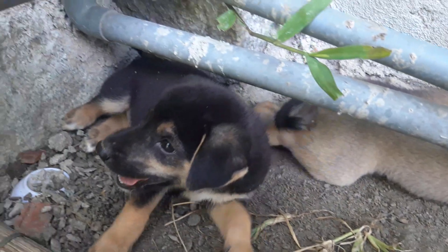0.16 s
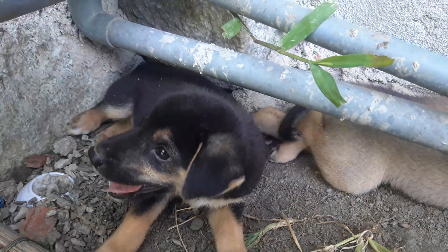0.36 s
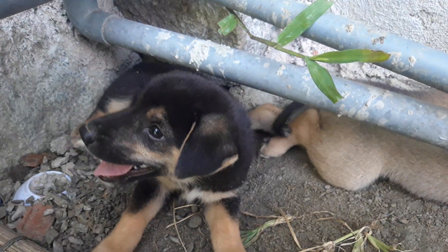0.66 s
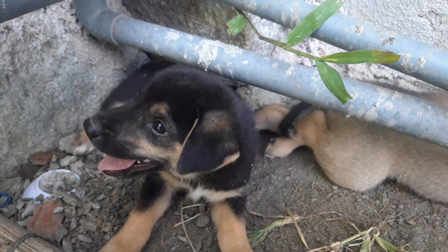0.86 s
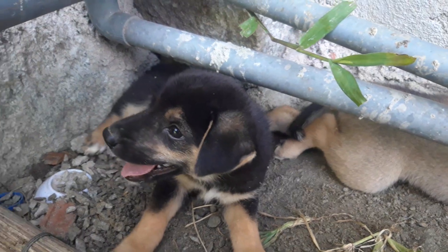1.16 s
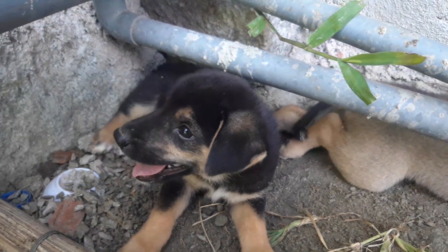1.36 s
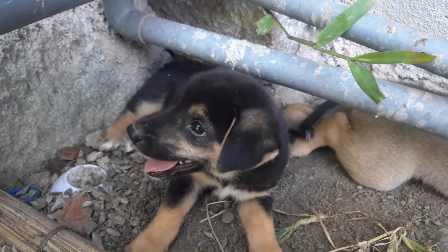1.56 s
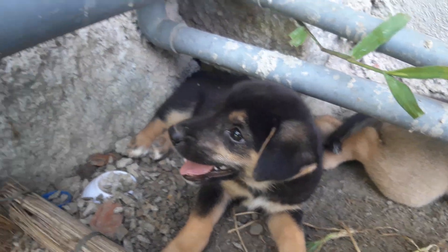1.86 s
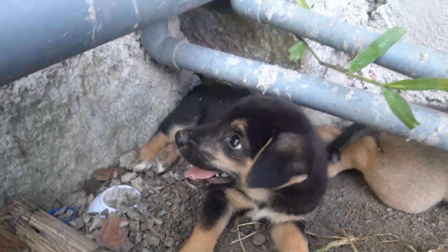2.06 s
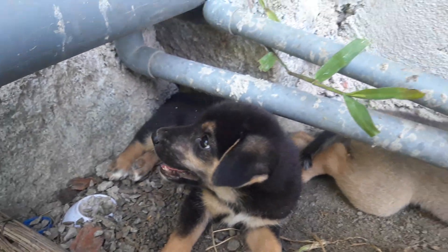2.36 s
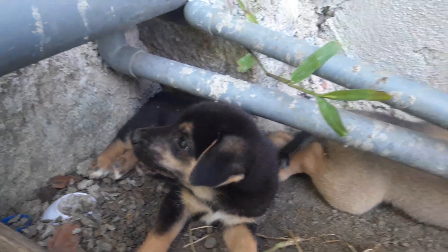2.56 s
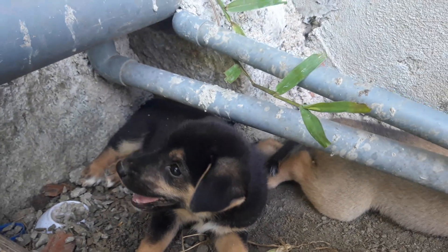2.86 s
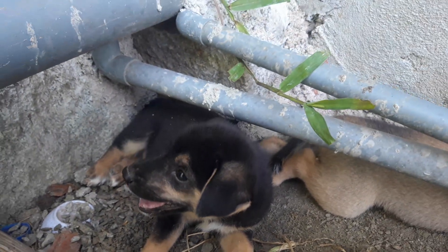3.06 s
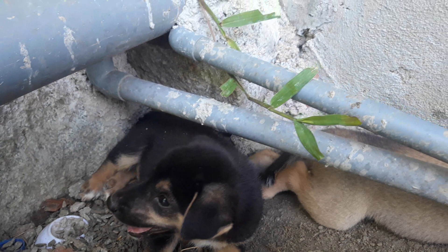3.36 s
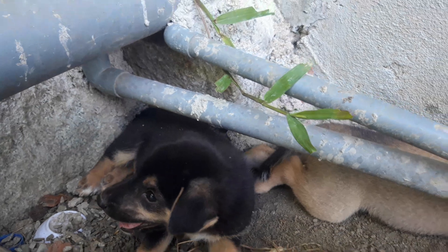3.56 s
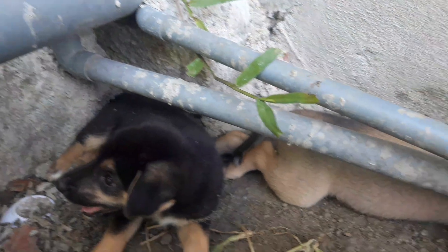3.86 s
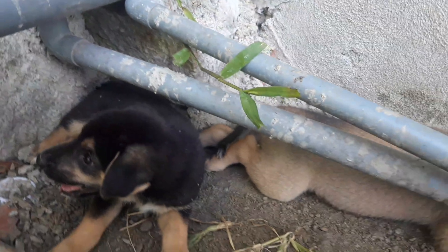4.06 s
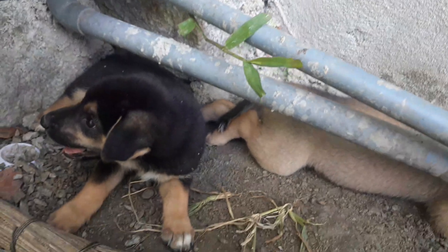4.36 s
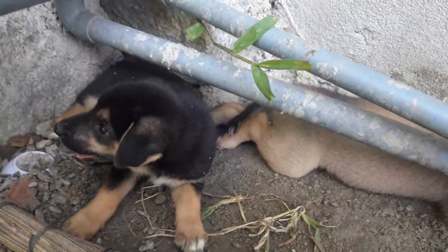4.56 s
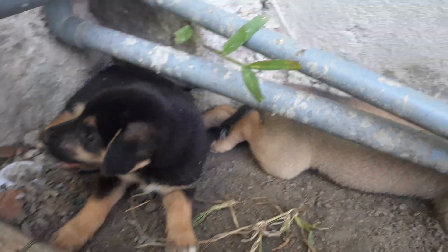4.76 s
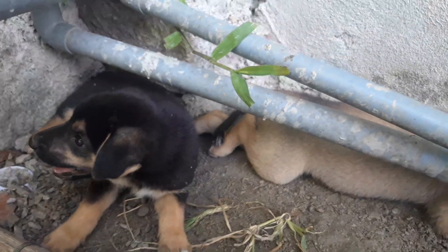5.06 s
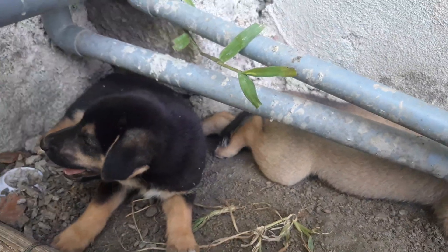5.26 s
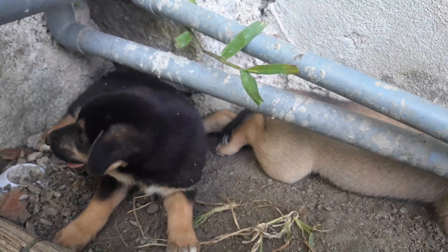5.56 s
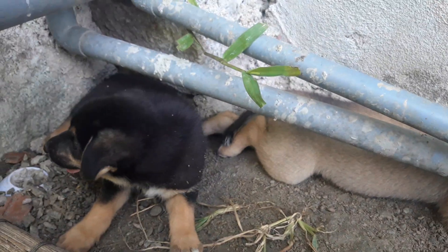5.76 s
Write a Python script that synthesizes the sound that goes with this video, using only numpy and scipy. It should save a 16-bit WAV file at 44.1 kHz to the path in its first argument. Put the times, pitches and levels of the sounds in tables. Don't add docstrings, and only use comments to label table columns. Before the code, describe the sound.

Close to the ground outdoors, a puppy pants in soft quick puffs and shifts on gravel and dry stalks, with bright snaps and crackles. Farther off, chicks give falling peeps, a small bird trills downward midway, and a hen clucks faintly. A cricket throbs early, distant traffic swells late, and cheeps gather near the end. Nearly mono, with light microphone hiss.

```python
import sys
import numpy as np
from scipy import signal
from scipy.fft import rfft, irfft, next_fast_len
from scipy.io import wavfile
from scipy.ndimage import uniform_filter1d

SR = 44100
rng = np.random.default_rng(int(sys.argv[2]) if len(sys.argv) > 2 else 0)


def rack_gain(trim_db):
    fader = np.asarray(trim_db, float)
    return 10 ** (fader / 20)


def store_wav(level_fs):
    pcm = np.round(np.clip(np.atleast_2d(level_fs), -1, 1) * 32767)
    wavfile.write(sys.argv[1], SR, pcm.T.astype(np.int16))


N = 261513
LEAD = SR // 5


def evened(x):
    return x / np.sqrt(np.mean(x ** 2) + 1e-20)


def read(points, hz):
    f, value = np.transpose(points)
    return np.interp(np.log(hz + 1), np.log(f + 1), value)


def curve(rows, column):
    return np.interp(np.arange(N) / SR, np.transpose(rows)[0], np.transpose(rows)[column])


def add(mix, s, sound):
    part = mix[LEAD + round(s * SR):][:len(sound)]
    part += sound[:len(part)]


def coloured(x, points):
    size = next_fast_len(len(x))
    gain = rack_gain(read(points, np.fft.rfftfreq(size, 1 / SR)))
    return irfft(rfft(x, size) * gain, size)[:len(x)]


def resonate(x, hz, width):
    b, a = signal.iirpeak(min(hz, .45 * SR), hz / width, SR)
    once = signal.lfilter(b, a, x)
    return signal.lfilter(b, a, once)


def swells(rows, column, rise):
    t, power = np.arange(N) / SR, 1e-10
    for row in rows:
        late = (t - row[0]) / row[1]
        bell = np.exp(-np.where(late < 0, late / rise, late) ** 2)
        power = power + rack_gain(row[column]) ** 2 * bell
    return np.sqrt(power)


TURNS_PER_S = 9


def echoes(x, t60, first_s):
    out, turn = 0, 2 * np.pi * TURNS_PER_S * np.arange(len(x)) / SR
    for share in (np.cos(turn), np.sin(turn)):
        at = np.arange(round(first_s * SR), SR // 2, 20)
        at = at + rng.integers(0, 20, len(at))
        taps = np.zeros(SR // 2 + 20)
        taps[at] = rng.choice([-1., 1.], len(at)) * rack_gain(-60 * at / SR / t60)
        taps = taps / np.linalg.norm(taps)
        out = out + share * signal.fftconvolve(x, taps)[:len(x)]
    return out


def notes(rows, held, fall=1, sag_per_s=0):
    return [(s, held * size, (1 - held) * size, hz, hz * fall * np.exp(-sag_per_s * size), db)
            for s, size, hz, db in rows]


def whistles(rows, bend, held_db, end_db, overtones_db, flutter, lands=False):
    out = np.zeros(LEAD + N)
    for s, held, falling, top_hz, low_hz, db in rows:
        t = np.arange(0, held + falling, 1 / SR)
        slide = np.clip((t - held) / falling, 0, 1) ** bend
        if lands:
            slide = np.sin(np.pi / 2 * slide) ** 2
        wobble = uniform_filter1d(rng.standard_normal(8000), size=60)
        wobble = evened(uniform_filter1d(wobble, size=60))[:len(t)]
        pitch_hz = top_hz * (low_hz / top_hz) ** slide * (1 + flutter * wobble)
        turns = np.cumsum(pitch_hz) / SR
        tone = sum(rack_gain(overtone_db) * np.sin(2 * np.pi * k * turns)
                   for k, overtone_db in enumerate([0, *overtones_db], 1))
        effort = [held_db - 3, held_db, 0, end_db]
        effort_db = db + np.interp(t, [0, held, held + .5 * falling, t[-1]], effort)
        add(out, s, np.sqrt(2) * rack_gain(effort_db) * tone * signal.windows.tukey(len(t), .3))
    return out


# f/Hz, level/dB per Hz
HISS = [(210, -31), (350, -17), (386, -13), (596, -7.5), (1420, -14.5), (2060, -14.5), (3090, -2.5),
        (5170, 2), (6370, -6), (8250, 4), (10300, -14), (11800, -7.5), (14500, -13.5), (15700, -25),
        (16500, -38)]
HISS_DB = -59


def hiss():
    frames, hz = N // 256 + 5, np.fft.rfftfreq(1024, 1 / SR)
    a, b, patches = rng.standard_normal((frames, 513, 3)).T
    patches = uniform_filter1d(patches, size=12, axis=0)
    patches = evened(uniform_filter1d(patches, size=12, axis=1))
    z = (a + 1j * b) * rack_gain(read(HISS, hz)[:, None] + 1.9 * patches)
    return rack_gain(HISS_DB) * evened(signal.istft(z, nperseg=1024, noverlap=768)[1][:N])


# f/Hz, level/dB per Hz
RUMBLE = [(12, -52), (20, -23), (40, -11), (65, 3.5), (163, 0), (180, -6), (195, -32), (220, -12.5),
          (290, -63), (480, -120)]
# f/Hz, level/dB per Hz
BOOM = [(41, -42), (70, -23), (113, 0.5), (129, 2), (163, -7), (199, -25), (220, -15), (290, -41),
        (480, -120)]
# f/Hz, level/dB per Hz
DRONE = [(110, -73), (190, -2.5), (205, -5), (270, -1), (318, -0.5), (360, -6), (414, -9), (520, -12),
         (680, -56), (1140, -120)]
# peak t/s, fading t/s, boom level/dB, drone level/dB
PASSES = [
    (.1, 0.41, -65, -82),
    (1.45, 0.19, -63.5, -79),
    (1.68, 0.067, -58.5, -88),
    (1.92, 0.25, -62.5, -79),
    (4.45, 0.24, -65.5, -75.5),
    (4.78, 0.12, -52, -65.5),
    (5.05, 0.26, -52, -65.5),
    (5.32, 0.073, -52.5, -83),
    (5.5, 0.15, -59, -78),
    (5.7, 0.18, -57, -75),
]
RUMBLE_DB, DRONE_FLOOR_DB = -66.5, -83.5
PASS_RISE = 0.64


def traffic():
    rumble, boom, drone = (evened(coloured(rng.standard_normal(N), c)) for c in (RUMBLE, BOOM, DRONE))
    engine_note = evened(resonate(rng.standard_normal(N), 313.2, 15.7))
    drone = drone + rack_gain(-4.0) * engine_note
    boom_gain = swells(PASSES, column=2, rise=PASS_RISE)
    drone_gain = np.hypot(rack_gain(DRONE_FLOOR_DB), swells(PASSES, column=3, rise=PASS_RISE))
    return rack_gain(RUMBLE_DB) * rumble + boom_gain * boom + drone_gain * drone


# t/s, throbs per s, level/dB
CRICKET = [
    (0, 11, -73),
    (.7, 10, -70),
    (1.0, 10, -66.5),
    (1.6, 7.9, -67),
    (2.2, 8.5, -68.5),
    (2.8, 6.1, -76),
    (3.0, 10.3, -109),
    (5.93, 6.9, -67.5),
]


def cricket():
    throb = .5 + .5 * np.cos(2 * np.pi * (np.cumsum(curve(CRICKET, 1)) / SR + 0.67))
    wing = evened(resonate(rng.standard_normal(N), 9240, 1100))
    return rack_gain(curve(CRICKET, 2) + 1.5) * (0.62 + throb ** 0.5) * wing


# peak t/s, fading t/s, fine grit level/dB, coarse scrape level/dB
SHIFTS = [(0, 0.12, -57.5, -64.5), (.3, 0.15, -60.5, -67), (.62, 0.19, -59.5, -71.5),
          (1.63, 0.11, -56.5, -66.5), (1.8, 0.15, -56.5, -67), (2.2, 0.43, -68.5, -92),
          (2.92, 0.077, -65, -74), (3.85, 0.69, -63, -71), (4.02, 0.1, -58, -62), (4.13, 0.046, -68, -61.5),
          (4.23, 0.25, -61.5, -77), (4.65, 0.21, -64.5, -76), (5.5, 0.38, -69.5, -76.5)]
SHIFT_RISE = 0.44


def grit(per_s, spread_db, colour, column):
    size_db = spread_db * np.minimum(rng.exponential(1, N), 2.6)
    grains = rng.standard_normal(N) * rack_gain(size_db)
    grains = evened(grains * (rng.random(N) < per_s / SR))
    keep = np.exp(-1 / (0.0021 * SR))
    scatter = np.sqrt(signal.lfilter([1 - keep], [1, -keep], grains ** 2)) * rng.standard_normal(N)
    return swells(SHIFTS, column, SHIFT_RISE) * evened(coloured(grains + rack_gain(7.0) * scatter, colour))


# f/Hz, level/dB per Hz
RUSTLE_COLOUR = [(530, -29), (900, -21.5), (991, -54), (1250, -32), (2020, -12.5), (3340, -0.5), (4310, -3),
                 (5410, 0), (6410, -8), (7680, -2), (8760, -6), (10400, -21.5), (11700, -9), (15100, -20.5),
                 (16000, -10)]
# f/Hz, level/dB per Hz
SCRAPE_COLOUR = [(500, -45), (800, -12), (1000, -5), (1500, -9), (2100, -5), (2600, 0), (3600, -3),
                 (6000, -20), (9000, -60)]


def rustle():
    fine = grit(2700, 4.1, RUSTLE_COLOUR, column=2)
    scrape = grit(1200, 0.75, SCRAPE_COLOUR, column=3)
    return rack_gain(7.5) * fine + rack_gain(3.0) * scrape


# peak t/s, fading t/s, level/dB
CRUSHES = [(1.59, .028, -53), (1.62, .04, -50), (1.66, .04, -52), (1.72, 0.036, -52), (1.79, .04, -51),
           (1.83, 0.045, -49), (1.9, .05, -54), (.65, 0.033, -59), (2.31, .03, -60), (2.49, .04, -63),
           (4.13, .05, -62), (4.38, 0.055, -58), (4.69, .04, -64)]
# f/Hz, width/Hz, level/dB
CRACKLE_RINGS = [
    (3660, 1300, -9),
    (5400, 710, 0.5),
    (7930, 1600, -1),
    (12300, 2500, -9),
    (14800, 2000, -10),
]


def crush():
    size_db = 4 * np.minimum(rng.exponential(1, N), 2.4)
    breaks = rng.standard_normal(N) * rack_gain(size_db) * (rng.random(N) < 3500 / SR)
    rings = sum(rack_gain(db) * evened(resonate(breaks, hz, width)) for hz, width, db in CRACKLE_RINGS)
    return swells(CRUSHES, column=2, rise=.4) * evened(rings)


# t/s, peak level/dB, ring f/Hz, treble over ring/dB
STALKS = [(0.1303, -25.5, 4000, 0), (0.2345, -29, 4000, -3), (0.271, -42, 5530, 0),
          (0.6386, -27.5, 6160, 1), (1.248, -33.5, 4740, 0), (1.5858, -25.5, 3800, 15),
          (1.6158, -27, 5280, 5), (1.6509, -26, 5760, 4), (1.7127, -19.5, 5500, 3), (1.716, -26, 5400, 16),
          (1.723, -21, 5600, 0.5), (1.7374, -17, 5500, 4), (1.778, -20, 4450, 9), (1.8085, -22.5, 5600, 2),
          (1.8597, -25.5, 5400, 0), (1.894, -24.5, 5700, 0), (1.952, -33, 3630, 11),
          (2.028, -26.5, 4300, -6), (2.2553, -33.5, 3250, 20), (2.311, -26, 5400, 3),
          (2.4703, -49, 3050, 12), (2.502, -34.5, 5050, -11), (4.044, -45, 5270, 5),
          (4.0685, -36, 3200, -4), (4.168, -37, 5130, 13.5), (4.2043, -43, 5150, 6), (4.221, -47, 5500, 8),
          (4.276, -42, 6840, 0), (2.4939, -42, 5000, 12), (2.5478, -45, 5040, 10), (3.744, -52, 6800, -5),
          (3.908, -40, 6000, 3), (3.997, -45, 6500, -3), (4.6697, -31.5, 3080, 0),
          (4.7002, -30, 4370, -2.5), (4.914, -36.5, 3800, 0)]
# t/s, peak level/dB, ring f/Hz
GRIT = [(0.1162, -30, 4800), (0.26, -40, 4300), (.559, -41, 3900), (.564, -37, 3600), (.568, -37, 3900),
        (0.56, -40, 7800), (0.672, -39, 6500), (.173, -37, 5100), (0.4, -32, 4800), (.393, -33, 4100),
        (0.573, -36, 4300), (0.661, -38, 6100), (1.2397, -32, 4800), (1.3, -38, 4700), (1.8, -34, 5540),
        (1.674, -33, 5800), (1.692, -36, 5500), (1.6095, -33, 5300), (1.5, -29, 5600), (1.844, -31, 5600),
        (1.755, -33, 4100), (1.9386, -31, 4000), (2.0877, -41, 5230), (2.1132, -32, 5100),
        (2.2152, -35.5, 5700), (2.315, -24.5, 5670), (3.5192, -26.5, 4660), (3.543, -46, 5000),
        (3.9517, -35, 4900), (4.1089, -26.5, 5000), (4.1353, -28, 6500), (4.6, -39, 4500),
        (4.083, -38, 4500), (4.398, -34.5, 6300), (4.429, -39, 4000), (4.448, -40.5, 4200),
        (4.274, -31, 4640), (4.348, -31.5, 4240), (4.3538, -30.5, 5400), (4.3856, -32.5, 4930),
        (4.4026, -32, 4060), (4.798, -39, 4660), (2.528, -42, 3800), (5.2864, -44, 4500),
        (2.3816, -39, 5700), (2.16, -38, 4800), (3.678, -45, 5500), (3.79, -42, 5000), (5.689, -42, 6500),
        (5.709, -38, 3200), (4.4, -44, 3000), (2.86, -43, 3200), (3.2, -44, 5000)]
# t/s, peak level/dB, ring f/Hz
KNOCKS = [(0.1157, -32, 2460), (0.1226, -33, 2300), (0.168, -47, 2550), (0.5605, -45, 2300),
          (0.566, -45, 2300), (0.5715, -39, 2250), (0.5767, -49, 2440), (.584, -48, 2300), (.59, -51, 2500),
          (1.777, -53, 2630), (1.777, -28, 2200), (4.0442, -35, 1750), (4.04, -41, 3000), (4.05, -47, 1100),
          (4.068, -38, 2600), (4.1083, -39, 1770), (4.4124, -43, 2680), (5.368, -36.5, 2400)]
GRIT_TREBLE_DB, TOP_UNDER_TREBLE_DB = -15, -6


def snaps():
    out, t = np.zeros(LEAD + N), np.arange(0, .012, 1 / SR)
    for s, peak_db, hz, treble_db in STALKS + [(*row, GRIT_TREBLE_DB) for row in GRIT]:
        splinter = rng.standard_normal(len(t)) * np.exp(-t / .0018) + 2 * (t == 0)
        bands = [(0, hz, .4 * hz), (treble_db, 8200, 1900), (treble_db + TOP_UNDER_TREBLE_DB, 12800, 5000)]
        crack = sum(rack_gain(db) * evened(resonate(splinter, f, width)) for db, f, width in bands)
        add(out, s, rack_gain(peak_db - 3.0) * crack / abs(crack).max())
    for s, peak_db, hz in KNOCKS:
        tap = rng.standard_normal(len(t)) * np.exp(-t / .0008) + 3 * (t == 0)
        knock = resonate(tap, hz, .36 * hz)
        add(out, s, rack_gain(peak_db - 1.0) * knock / abs(knock).max())
    return (out + rack_gain(-9) * echoes(out, 0.08, .002))[LEAD:]


# t/s, peak level/dB, mouth resonance f/Hz
PANTS = [(0.143, -59, 720), (0.31, -52, 730), (0.455, -48.5, 747), (0.615, -47.5, 786), (0.78, -55.5, 733),
         (0.939, -57.5, 870), (1.109, -60, 810), (1.284, -64, 755), (1.638, -61, 790), (3.022, -78, 794),
         (3.186, -65, 860), (3.341, -63, 865), (3.509, -61, 860), (3.678, -62, 720), (3.833, -66, 690),
         (4.167, -74, 1000), (4.375, -58, 950), (4.438, -65, 933), (4.939, -62, 835), (5.124, -62.5, 899),
         (5.329, -58, 820), (5.489, -57.5, 820), (5.641, -61, 840), (5.714, -60.5, 900)]


def panting():
    out, t = np.zeros(LEAD + N), np.arange(0, .09, 1 / SR)
    puff = np.exp(-((t - .018) / 0.02) ** 2)
    for s, db, hz in PANTS:
        air = rng.standard_normal(len(t))
        mouth = evened(resonate(air, hz, 182) + rack_gain(-37) * resonate(air, 0.82 * hz, 230))
        add(out, s, rack_gain(db - 10.5) * mouth * puff)
    return (out + rack_gain(-9.5) * echoes(out, 0.75, 0.00624))[LEAD:]


# t/s, level/dB
CLUCKS = [
    (2.53, -79),
    (2.738, -79),
    (2.953, -75.5),
    (3.15, -82),
    (3.545, -78),
    (4.668, -82),
    (5.345, -81),
    (5.5, -84),
    (5.85, -78.5),
]
# t/s, length t/s, top f/Hz, level/dB
CROON = [
    (1.452, .075, 1180, -86),
]
CLUCK_S, CLUCK_HZ, CLUCK_HELD, CLUCK_FALL = 0.034, 1210, 0.31, 0.96


def hen():
    clucks = [(s, CLUCK_S, CLUCK_HZ, db) for s, db in CLUCKS]
    voice = whistles(notes(clucks, CLUCK_HELD, CLUCK_FALL), 0.7, -0.34, -1.7, [-9, -9], 0.02)
    voice += whistles(notes(CROON, .4, .987), 1, -3, -1, [12, 18], .008)
    return (rack_gain(2) * voice + rack_gain(-1.4) * echoes(voice, 0.2, 0.0046))[LEAD:]


# t/s, level/dB
TRILL = [(2.256, -51), (2.364, -50), (2.465, -48.5), (2.566, -49.5), (2.66, -49.5), (2.744, -50.5),
         (2.841, -51.5), (2.925, -52.5), (3.012, -51), (3.105, -52.5), (3.197, -52.5), (3.29, -55),
         (3.387, -58.5)]
# t/s, length t/s, top f/Hz, level/dB
GRACE = [
    (2.246, 0.03, 2910, -60),
    (2.275, 0.084, 3290, -55.5),
    (2.335, 0.035, 3280, -54),
]
TRILL_NOTE_S, TRILL_HELD = .052, .14
TRILL_HZ, TRILL_SINK_HZ_PER_S, TRILL_EAGER_HZ, TRILL_SETTLE_S = 2999, 212, 330, 0.229
TRILL_LOW_HZ, TRILL_TIRE_HZ = 2826, 205


def trilling_bird():
    rows = notes(GRACE, 0.35, 0.91)
    for s, db in TRILL:
        age = s - TRILL[0][0]
        top_hz = TRILL_HZ - TRILL_SINK_HZ_PER_S * age + TRILL_EAGER_HZ * np.exp(-age / TRILL_SETTLE_S)
        low_hz = TRILL_LOW_HZ - TRILL_TIRE_HZ * age ** 2
        size = TRILL_NOTE_S * top_hz ** 2 / TRILL_LOW_HZ ** 2
        rows += notes([(s, size, top_hz, db)], TRILL_HELD, low_hz / top_hz)
    voice = whistles(rows, .65, -1, -4, [-35], .017)
    near, far = echoes(voice, .1, .001), echoes(voice, .46, .01)
    return (rack_gain(-2) * voice + rack_gain(-5) * near + rack_gain(-2.5) * far)[LEAD:]


# t/s, length t/s, top f/Hz, level/dB
PIPES = [
    (5.64, .062, 3320, -60),
    (5.765, .034, 3130, -58.5),
]


def piping_chick():
    voice = whistles(notes(PIPES, 0.23), 0.71, -0.37, -1.3, [-1.5], 0.0077)
    return (voice + rack_gain(-11) * echoes(voice, .15, .005))[LEAD:]


# t/s, length t/s, top f/Hz, level/dB
CHEEPS = [
    (1.915, 0.04, 3980, -49.5),
    (4.862, 0.046, 4020, -56),
    (4.992, 0.052, 4270, -46.5),
    (5.355, 0.05, 4300, -51.5),
    (5.478, 0.064, 4280, -45),
    (5.64, 0.0663, 4370, -39.5),
    (5.725, 0.054, 4440, -49),
    (5.205, 0.03, 3950, -63),
]
CHEEP_HELD, CHEEP_SAG_PER_S = 0.24, 3.7


def cheeping_chick():
    voice = whistles(notes(CHEEPS, CHEEP_HELD, sag_per_s=CHEEP_SAG_PER_S), 1, -2.5, -12, [-8], .02)
    near, far = echoes(voice, .09, .001), echoes(voice, .3, .01)
    shed = resonate(echoes(voice, .42, .01), 4200, 3000)
    return (rack_gain(-5) * voice + rack_gain(-7) * near + rack_gain(-1) * shed + rack_gain(-9) * far)[LEAD:]


# t/s, length t/s, top f/Hz, level/dB
PEEPS = [
    (-.065, 0.097, 5420, -44),
    (0.262, 0.11, 5400, -49),
    (0.642, 0.11, 5820, -41.5),
    (3.175, 0.11, 5170, -53),
    (3.584, .1, 5370, -46.5),
    (5.55, 0.1, 5200, -47.5),
]
# t/s, length t/s, top f/Hz, level/dB
SIGHS = [
    (1.29, 0.033, 3500, -62),
    (.738, 0.03, 2950, -49),
    (5.14, 0.05, 3300, -68.5),
    (5.252, 0.08, 3150, -64),
    (5.66, 0.056, 2950, -53),
]
PEEP_HELD, PEEP_END_HZ = .42, 2880
SIGH_HELD, SIGH_FALL = 0.148, .76


def peeping_chick():
    peeps = [notes([row], PEEP_HELD, PEEP_END_HZ / row[2])[0] for row in PEEPS]
    voice = whistles(peeps, .66, -10, -5, [-30], .024, lands=True)
    voice += whistles(notes(SIGHS, SIGH_HELD, SIGH_FALL), .9, 0, -5, [-30], .03)
    walls = echoes(voice, .2, .001)
    shed = resonate(echoes(voice, .55, .01), 3600, 4200)
    return (rack_gain(-12) * voice + rack_gain(-1) * walls + rack_gain(1.5) * shed)[LEAD:]


# f/Hz, side under mid level/dB
SIDE_DB = [(60, -24), (130, -53), (290, -21), (640, -19.5), (1410, -20), (3100, -31.5), (6820, -28.5),
           (10000, -23.5), (15000, -12)]


def widened(mid):
    hz, _, z = signal.stft(mid, SR, nperseg=1024)
    spin = np.exp(2j * np.pi * rng.random(z.shape[::-1]).T)
    blur = uniform_filter1d(abs(z), size=3, axis=1)
    side_gain = rack_gain(read(SIDE_DB, hz)[:, None] + 2.0)
    side = signal.istft(blur * spin * side_gain, SR, nperseg=1024)[1][:N]
    return np.array([mid + side, mid - side])


def scene():
    background = hiss() + traffic() + cricket()
    puppy = rustle() + crush() + snaps() + panting()
    chicks = piping_chick() + cheeping_chick() + peeping_chick()
    return widened(background + puppy + hen() + trilling_bird() + chicks)


def top_cut(x):
    return signal.sosfilt(signal.butter(12, 16810, fs=SR, output="sos"), x)


def record(dry):
    edge = signal.firwin(401, 15750, window=("kaiser", 7), fs=SR)
    mix = signal.oaconvolve(dry, edge[None], "same")
    return top_cut(mix)


dry = scene()
out = record(dry)
store_wav(out)
```